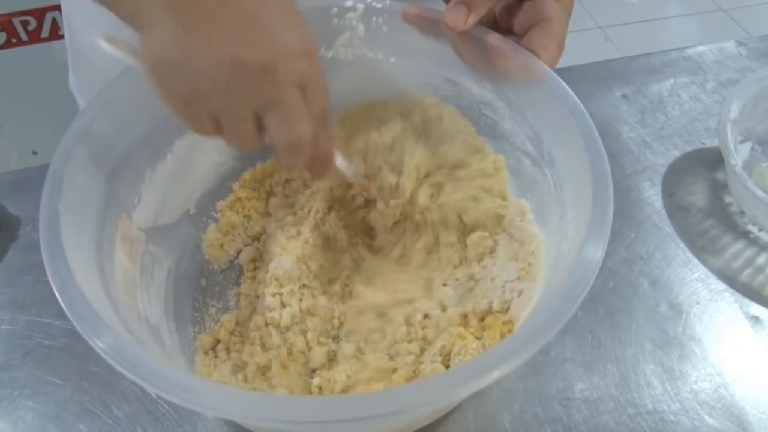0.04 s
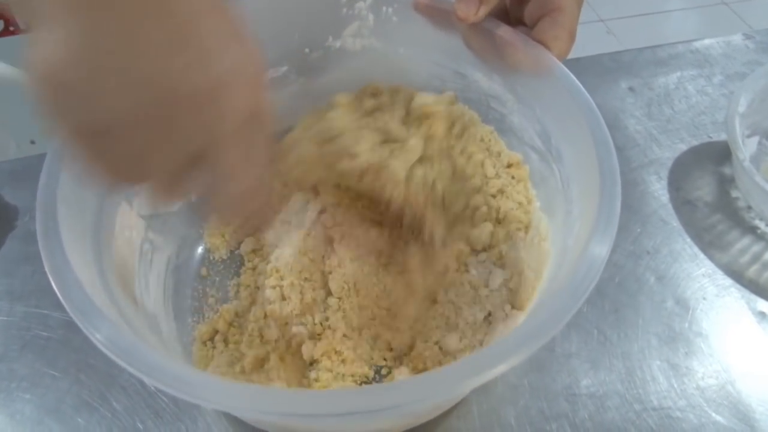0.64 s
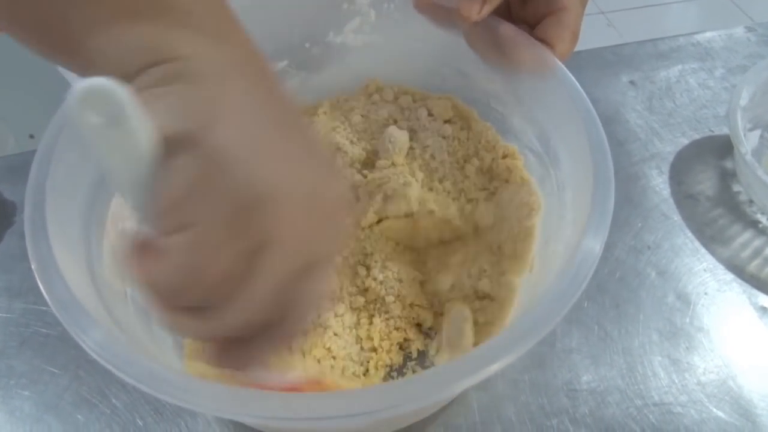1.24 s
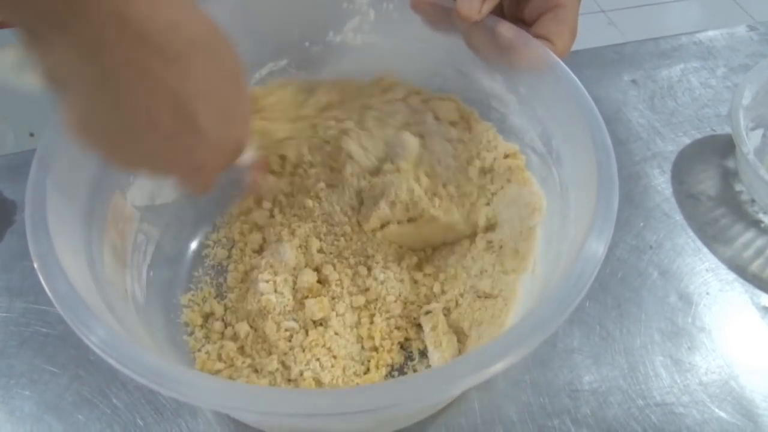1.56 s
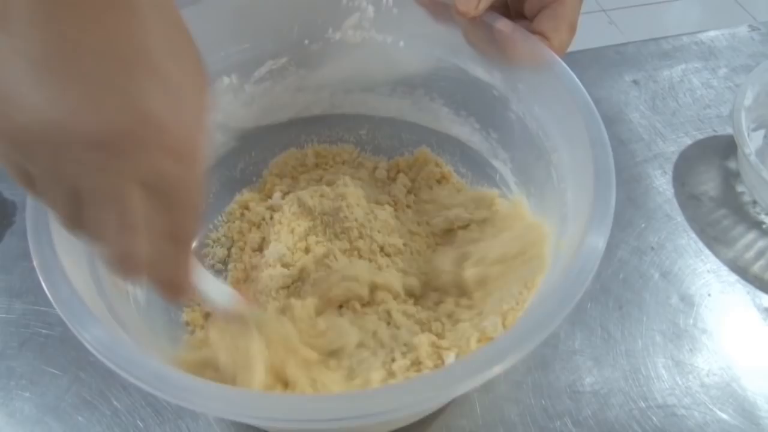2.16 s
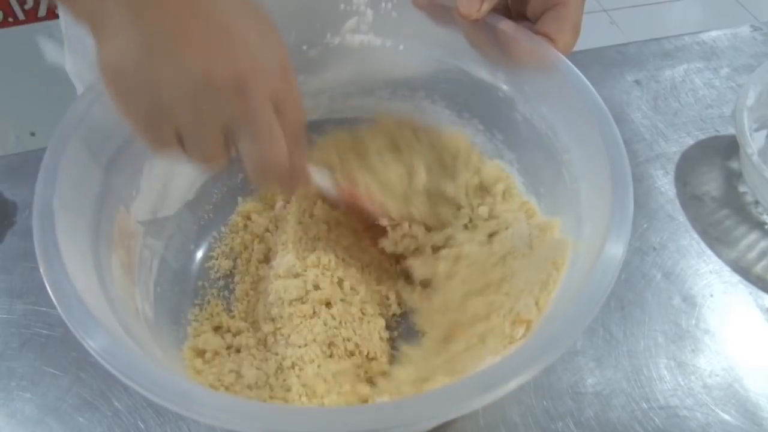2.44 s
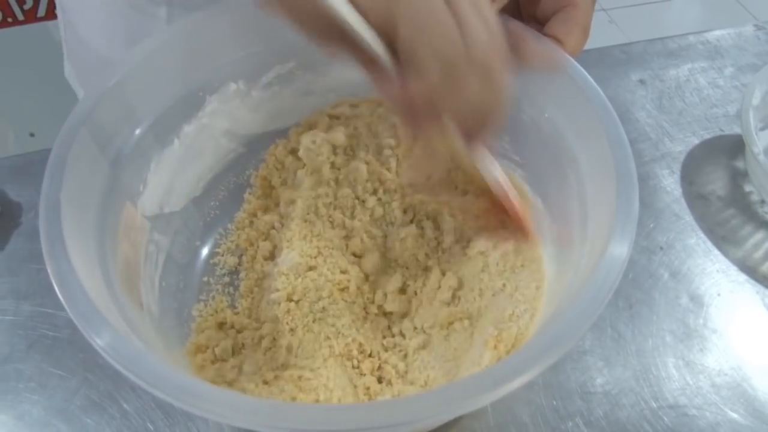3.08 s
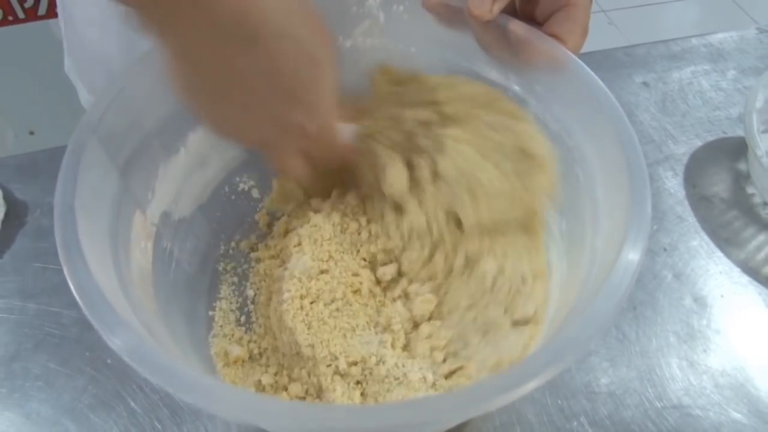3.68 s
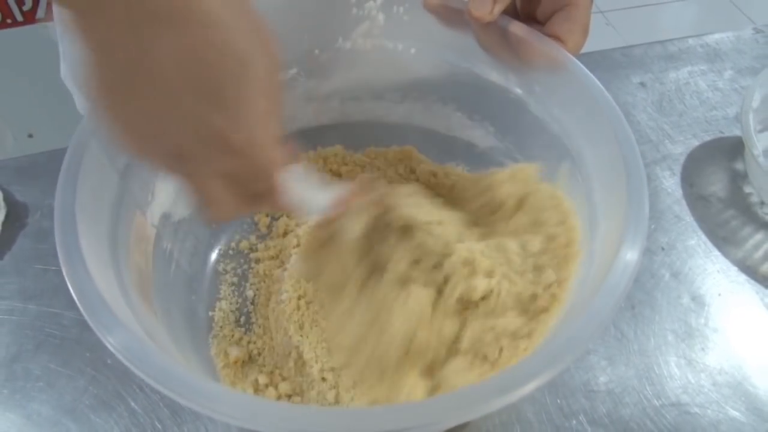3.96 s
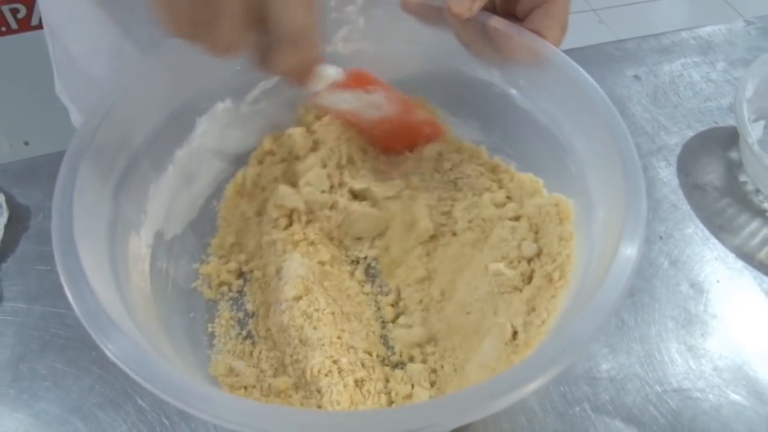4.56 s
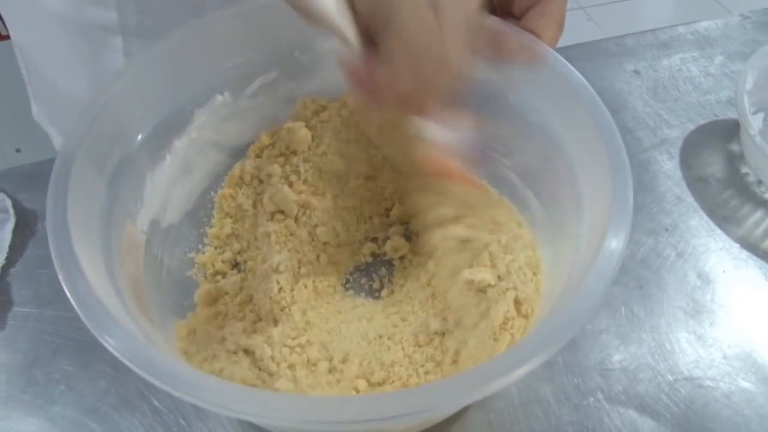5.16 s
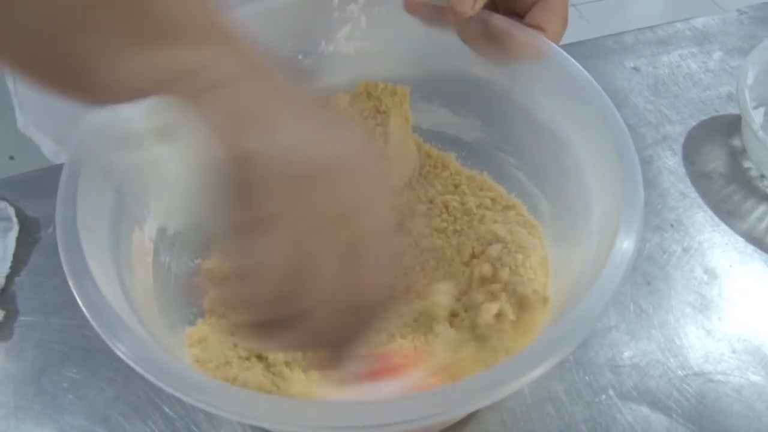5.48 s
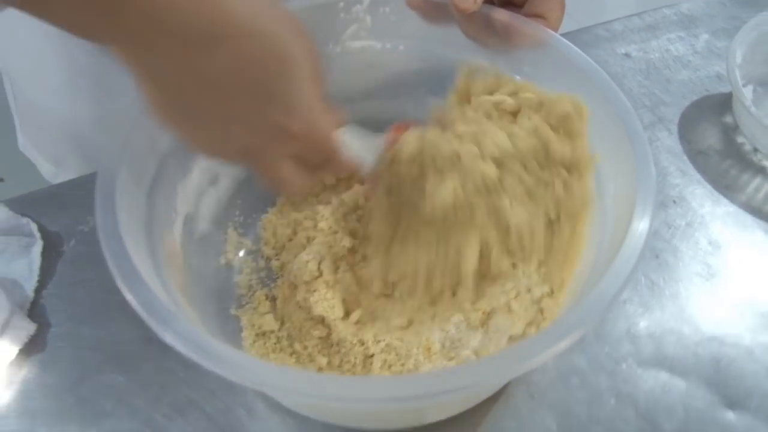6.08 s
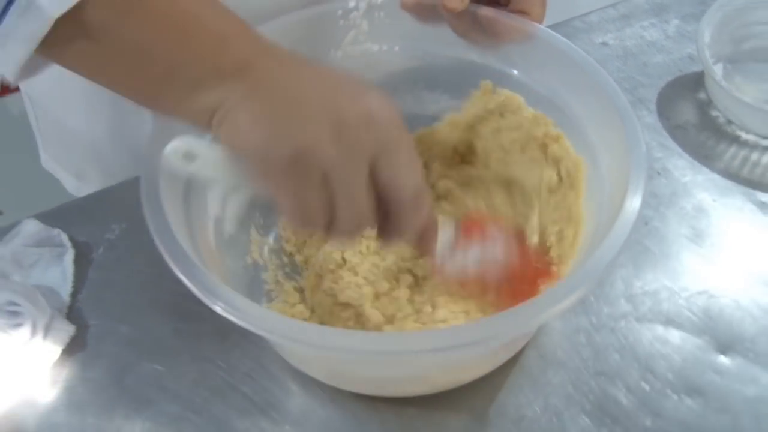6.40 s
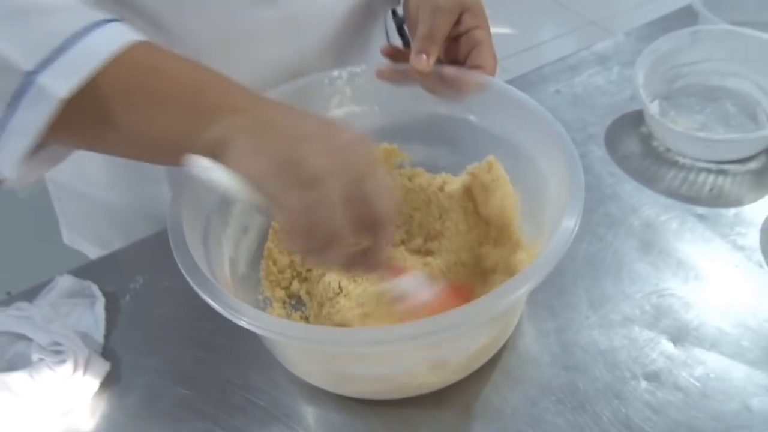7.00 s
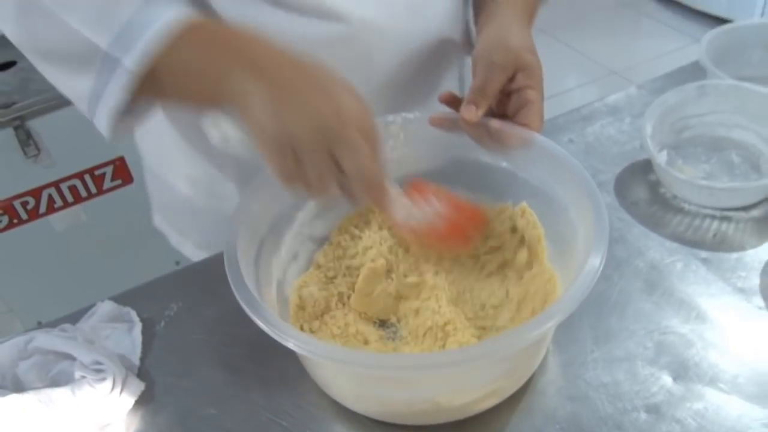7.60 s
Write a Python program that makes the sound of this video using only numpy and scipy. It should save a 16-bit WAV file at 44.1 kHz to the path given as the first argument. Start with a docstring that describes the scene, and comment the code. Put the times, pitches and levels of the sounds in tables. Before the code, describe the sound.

A plastic spoon stirs a dry, crumbly mix in a plastic bowl, with close gritty rustling, scraping and scattered knocks.

```python
"""A plastic spoon stirs a dry, crumbly mix in a plastic bowl on a steel counter, heard close up in mono.
Over faint kitchen air and hum, the spoon digs in at once and knocks the bowl within half a second.
Stroke after stroke then pushes the heap, rubs the bowl, shears crumbs and scrapes flour along the wall.
More knocks and ticks follow, echoing briefly in the small room; the hardest comes at about 6 s.
In the last second the strokes grow lighter and die away."""
import sys
import numpy as np
from scipy import signal
from scipy.fft import rfft, irfft, next_fast_len
from scipy.io import wavfile
from scipy.ndimage import uniform_filter1d, map_coordinates

SR = 44100
rng = np.random.default_rng(int(sys.argv[2]) if len(sys.argv) > 2 else 0)


def unload_wav(signal):
    """Save mono or channel-first audio to the path in sys.argv[1] as 16-bit WAV at rate SR, clipped to [-1, 1]."""
    wavfile.write(
        sys.argv[1],
        SR,
        np.round(np.clip(np.atleast_2d(signal).T, -1, 1) * 32767).astype(np.int16),
    )


N = 345855

# tone colour of the room air: frequency_hz, relative_db
AIR_COLOUR = [(25, -37.5), (60, 6), (100, -14), (250, -5), (600, 4.5), (1500, -19), (4000, -22.5),
              (15000, -29.5)]
# tones of a kitchen motor: pitch_hz, level_db
MOTOR_TONES = [(177, -79.5), (352, -82)]
# how long the room's echo takes to fade by 60 dB: frequency_hz, fade_s
ECHO_FADES = [(150, 0.44), (600, 0.21), (2000, 0.25), (6000, 0.086), (15000, 0.099)]

# broad resonances of the filled bowl: centre_hz, width_hz, relative_db
BOWL_RESONANCES = [(190, 190, -5), (449, 160, 9.5), (933, 266, 5.5), (1715, 250, 4.5), (2300, 760, 0),
                   (3620, 810, 1), (5230, 3100, -4), (8950, 5800, -39)]
# ringing tones of the free wall above the mix: pitch_hz, relative_db, fade_s (to fall by 60 dB)
WALL_TONES = [(498.4, -2, 0.17), (562.5, 4, 0.096), (906, -15, 0.089), (1034, -3.5, .08),
              (1622, 3.5, 0.035), (1760, -5.5, 0.086), (1816, 2, 0.021), (2044, 7, 0.033),
              (2370, -10, 0.042), (2930, 1.5, 0.028), (4800, 3, 0.054)]
# the spoon hits the bowl: time_s, knock_peak_db, low_hz, high_hz, ring_db (relative to the knock)
SPOON_HITS = [(0.3093, -22.5, 1590, 2630, -14), (.34, -27, 1400, 2860, -6.5), (.427, -9.5, 990, 1910, -7.5),
              (0.4563, -28, 504, 6040, -29), (0.809, -34.5, 1900, 2020, -0.5),
              (1.605, -21.5, 1330, 2400, -25), (1.7507, -15.5, 326, 2400, -12),
              (1.7997, -24, 1700, 2410, -3), (2.3624, -12, 640, 2000, -26), (2.73, -30.5, 1150, 2130, -10),
              (2.888, -31.5, 1540, 2050, -10), (3.5007, -11, 2800, 4970, -22),
              (3.776, -10.5, 332, 2410, -8), (4.148, -32.5, 1800, 2420, -2.5),
              (5.4728, -23.5, 1490, 5840, -11), (5.542, -25, 3000, 8000, -29),
              (5.831, -25.5, 1450, 2980, -18), (6.007, -12, 1700, 4800, -30), (6.0245, -8, 397, 2370, -12),
              (6.322, -31.5, 1560, 2980, -6), (6.464, -30, 500, 1960, -9.5), (7.459, -43, 890, 10900, -22),
              (7.829, -34, 453, 1980, -6)]

# tone colours of the five stirring noises: frequency_hz, relative_db
PUSH_COLOUR = [(25, -39), (45, -11), (65, -1), (100, 2.5), (155, -2), (190, 3.5), (235, -1), (310, 2),
               (520, -2), (720, -5), (1100, -7.5), (2500, -42)]  # the heap being shoved
RUB_COLOUR = [(300, -14.5), (600, -7), (800, -7.5), (980, -1), (1200, -5), (1420, -3), (1620, -1.5),
              (1860, 0.5), (2300, -4.5), (3000, -6.5), (5000, -50)]  # the spoon on the bowl
RUSTLE_COLOUR = [(900, -51.5), (1900, -12), (2600, -2), (3500, 1), (4000, -1), (4700, -0.5), (6500, -5),
                 (8500, -9), (14000, -30.5)]  # crumbs sliding past each other
SCRAPE_COLOUR = [(2500, -35.5), (5000, -4.5), (7000, -1), (9000, -0.5), (11500, -3), (13300, -7.5),
                 (15000, -10.5), (16000, -7)]  # flour dragged along the wall
FINE_FLOUR_COLOUR = [(5000, -40), (9000, -9.5), (11500, 0), (13300, -3), (15000, -1)]  # the finest flour under a fast blade

# The next five tables give base levels, which the functions shift and shake.
# the spoon is drawn through the mix: start_s, rise_s, length_s, rustle_db, rub_db, hiss_db
SPOON_STROKES = [(-0.043, 0.037, 0.095, -49, -42.5, -55), (0.284, 0.116, 0.29, -51, -49, -56.5),
                 (0.784, 0.12, 0.21, -51.5, -47.5, -54.5), (1.069, 0.049, 0.059, -61.0, -51.5, -64.5),
                 (1.171, 0.052, 0.42, -47.5, -50, -55.5), (1.539, 0.011, 0.4, -46.5, -45.5, -53.5),
                 (2.089, 0.19, 0.14, -52, -46, -57.5), (2.253, 0.045, 0.24, -52.0, -48, -58.5),
                 (2.715, 0.074, 0.26, -53, -55, -56.5), (3.096, 0.14, 0.35, -46, -52.5, -52),
                 (3.442, 0.034, 0.44, -47, -46, -53.0), (3.904, 0.047, 0.13, -60.5, -58.5, -59.5),
                 (4.134, 0.0086, 0.059, -56.5, -52, -59), (4.205, 0.054, 0.25, -51, -49, -57),
                 (4.458, 0.38, 0.36, -52, -46, -64), (4.911, 0.045, 0.16, -59.5, -50, -65.5),
                 (5.034, 0.062, 0.24, -52, -51, -56.5), (5.379, 0.022, 0.15, -47, -50.5, -52),
                 (5.552, 0.02, 0.14, -49.5, -55, -54.5), (5.687, 0.055, 0.42, -45.5, -46, -52.5),
                 (6.151, 0.036, 0.18, -55.5, -55, -56), (6.327, 0.07, 0.2, -52, -51, -53.5),
                 (6.55, 0.063, 0.082, -51.0, -49.5, -58), (6.768, 0.045, 0.25, -51.5, -53.5, -54.5),
                 (7.035, 0.023, 0.2, -54, -57.0, -61.5), (7.437, 0.033, 0.12, -53.5, -53.5, -56.0),
                 (7.663, 0.048, 0.16, -64, -61, -71.0)]
# the spoon's blade sweeps fast along the floury wall: start_s, rise_s, length_s, hiss_db
FAST_SWEEPS = [(1.21, 0.045, 0.044, -46), (2.768, 0.12, 0.175, -44), (3.135, 0.076, 0.128, -49.5),
               (4.742, 0.053, 0.095, -52.0), (5.097, 0.071, 0.14, -41), (5.384, 0.034, 0.15, -44.5)]
# the spoon digs into the heap: start_s, rise_s, push_db, settle_s
HEAP_DIGS = [(0.0, 0.0077, -47.5, 0.12), (0.384, 0.014, -40.5, 0.13), (.857, .01, -46, .07),
             (0.9302, .003, -40, 0.11), (1.59, 0.026, -48.5, 0.087), (1.75, .01, -53.5, 0.22),
             (2.29, 0.0083, -41, 0.058), (2.465, 0.018, -54, 0.077), (3.47, 0.027, -45, .05),
             (3.615, 0.014, -47.5, 0.036), (3.776, 0.0092, -53, 0.16), (4.2432, 0.00077, -41, 0.12),
             (5.655, 0.015, -52.5, .05), (5.871, .02, -41, 0.13), (6.4365, 0.0049, -47, 0.084),
             (6.98, .002, -56, .07), (7.503, .002, -47.5, .11)]
# the blade's edge bites on the bare wall: peak_s, half_length_s, pitch_hz, level_db
EDGE_BITES = [(1.267, .02, 5260, -48.5), (1.324, 0.054, 7200, -51), (1.45, 0.033, 4770, -48),
              (1.595, 0.05, 8100, -50), (3.498, 0.018, 4480, -37.5), (5.495, 0.047, 5660, -41.5),
              (5.734, 0.027, 3720, -49)]
# the blade bears down and chatters through crumbs: peak_s, half_length_s, rub_db, rustle_db
BLADE_PRESSES = [(0.05, 0.015, -41.5, -61), (1.853, 0.081, -45.5, -54), (2.215, .008, -48, -58),
                 (2.327, 0.017, -37, -47), (2.773, 0.014, -47, -55), (2.897, .015, -55, -47),
                 (3.824, 0.021, -42.5, -47), (4.273, 0.021, -42, -49.5), (4.83, 0.035, -51, -49.5),
                 (5.04, .025, -47, -60), (5.163, 0.014, -46.5, -48), (5.44, 0.031, -44, -50),
                 (5.74, 0.028, -55, -42.5), (6.318, 0.0092, -49, -62), (6.638, 0.024, -47.5, -62)]

LIFT_S, SWEEP_RELEASE_S = 0.052, 0.013  # how fast a stroke and a sweep die away
TRICKLE_DB, TRICKLE_S = -12.5, 0.087  # loose crumbs keep sliding after the spoon lifts
HEAP_DB = -13.5  # rumble of the moving heap, relative to the rub
DIG_RUB_DB, THUD_DB = -17.5, 11.5  # a dig's rub and an instant landing's thud, relative to push_db
DIG_HOLD_S, THUD_RISE_S = 0.0069, 0.0073  # time at full push; the rise time that halves the thud
IDLE_RUSTLE_DB, IDLE_RUB_DB, IDLE_HISS_DB = -71.5, -63.5, -78  # the heap never quite comes to rest
HAND_DB, HAND_PER_S = 0.7, 24  # unsteadiness of the hand's pressure
PUFF_DB, PUFF_RISE_S, PUFF_FADE_S = -56, .003, 0.0049  # every hit shakes flour off the blade


def amp(db):
    """Turn decibels into a gain."""
    return 10 ** (np.asarray(db) / 20)


def unit(x):
    """Scale to an average strength (rms) of 1."""
    return x / np.sqrt(np.mean(x ** 2) + 1e-20)


def along(points, hz):
    """Read between (frequency, value) points on a logarithmic frequency scale."""
    frequencies, values = np.transpose(points)
    return np.interp(np.log(hz + 1), np.log(frequencies), values)


def filtered(x, response):
    """Multiply each frequency in x by response(hz)."""
    size = next_fast_len(len(x) + 8192)
    return irfft(rfft(x, size) * response(np.fft.rfftfreq(size, 1 / SR)), size)[:len(x)]


def coloured(x, colour):
    """Give x a tone colour, at strength 1."""
    return unit(filtered(x, lambda hz: amp(along(colour, hz))))


def resonance(x, hz, octaves):
    """Keep a band of x around hz, which may move over time."""
    f, t, spectrum = signal.stft(x, SR, nperseg=256)
    distance = np.log2((f[:, None] + 1) / np.interp(t * SR, np.arange(N), hz))
    return unit(signal.istft(spectrum / (1 + (distance / octaves) ** 2), SR, nperseg=256)[1][:N])


def wobble(per_s):
    """A smooth curve through per_s random values a second."""
    return map_coordinates(rng.standard_normal(int(N * per_s / SR) + 4), [np.arange(N) * per_s / SR])


def envelope(start_s, rise_s, length_s, release_s):
    """Rise, hold until length_s after the start, then die away."""
    t = np.arange(N) / SR - start_s
    return np.clip(t / rise_s, 0, 1) * np.exp(-np.maximum(t - length_s, 0) / release_s)


def swell(peak_s, half_s):
    """A bell-shaped rise and fall around a moment."""
    return np.exp(-.5 * ((np.arange(N) / SR - peak_s) / half_s) ** 2)


def air_and_hum():
    """Faint room air with a slightly unsteady motor hum."""
    t = np.arange(N) / SR
    hum = sum(amp(db) * unit(np.sin(2 * np.pi * hz * t + 0.25 * wobble(4.5))) for hz, db in MOTOR_TONES)
    return hum + amp(-71.5) * coloured(rng.standard_normal(N), AIR_COLOUR)


def kitchen_echo(x, gap_s=.004):
    """Counter and walls throw back a blur of sound; the treble dies first."""
    hz, t, noise = signal.stft(rng.standard_normal(SR // 2), SR, nperseg=256)
    fade = amp(-60 * t / along(ECHO_FADES, hz)[:, None])
    tail = signal.istft(noise * fade, SR, nperseg=256)[1]
    tail = np.pad(tail / np.linalg.norm(tail), (round(gap_s * SR), 0))
    return signal.fftconvolve(x, tail)[:N]


def bowl_response(hz, spread_s=0.000693):
    """The bowl colours a blow and smears it, as low bending waves travel more slowly."""
    body = sum(amp(db) * 1j * hz * width / (centre ** 2 - hz ** 2 + 1j * hz * width)
               for centre, width, db in BOWL_RESONANCES)
    return body * np.exp(-4j * np.pi * spread_s * np.sqrt(1000 * hz))  # spread_s: delay at 1 kHz


def bowl_blow(low_hz, high_hz, ring_db, crunch_db, build_s=0.00056, crunch_s=0.021):
    """One blow, cushioned by the mix, crushes crumbs and bends the bowl; the free wall rings on."""
    t = np.arange(SR // 5) / SR
    stiffness = signal.butter(2, low_hz, "high", fs=SR, output="sos")
    cushion = signal.butter(4, high_hz, fs=SR, output="sos")
    crunch = rng.standard_normal(len(t)) * amp(crunch_db - 60 * t / crunch_s)
    force = signal.sosfilt(stiffness, signal.sosfilt(cushion, t == 0) + crunch)
    knock = filtered(force, bowl_response)
    wall = np.zeros(len(t))
    for hz, db, fade_s in WALL_TONES:
        level = amp(db + rng.standard_normal() - 60 * t / fade_s)
        wall += level * np.sin(2 * np.pi * (hz * t + rng.random()))
    ring = signal.fftconvolve(force, wall * (1 - np.exp(-t / build_s)))[:len(t)]
    return knock / np.abs(knock).max() + amp(ring_db) * ring / np.abs(ring).max()


def knocks(thud_low_hz=80, thud_high_hz=540, thud_ring_db=-20):
    """Hits on the bowl and soft thuds in the heap; a lighter touch has a larger share of crunch."""
    out = np.zeros(N + SR)
    thuds = [(s, db + THUD_DB - 20 * np.log10(1 + rise / THUD_RISE_S),
              thud_low_hz, thud_high_hz, thud_ring_db) for s, rise, db, _ in HEAP_DIGS]
    for s, db, low_hz, high_hz, ring_db in SPOON_HITS + thuds:
        blow = amp(db) * bowl_blow(low_hz, high_hz, ring_db, crunch_db=-48.5 - 0.26 * db)
        out[round(s * SR):][:len(blow)] += blow
    return out[:N]


def grains(per_s, scatter_db=4):
    """Grains slip at random moments, making tiny clicks of many sizes."""
    moments = rng.random(N) < per_s / SR
    size = amp(scatter_db * np.clip(rng.standard_normal(N), -2.5, 2.5))
    return unit(moments * size * rng.choice([-1, 1], N))


def edge_swishes():
    """The blade's edge swishes grittily on the wall; its pitch glides from one bite to the next."""
    level = sum(amp(db) * swell(s, half) for s, half, _, db in EDGE_BITES)
    peaks_s, _, pitches_hz, _ = np.transpose(EDGE_BITES)
    glide_hz = np.interp(np.arange(N) / SR, peaks_s, pitches_hz)
    flicker = amp(2.9 * wobble(70))
    return level * flicker * resonance(grains(3000), glide_hz, octaves=0.49)


def slips(per_s, settle_s):
    """The mix gives way suddenly, then settles: a saw-toothed random curve."""
    kicks = (rng.random(N) < per_s / SR) * rng.uniform(0.5, 1, N)
    settling = np.sqrt(signal.lfilter([1], [1, -np.exp(-1 / (settle_s * SR))], kicks))
    return unit(settling - settling.mean())


def shifting_heap(x, depth_db):
    """The heap keeps changing shape, so its colour drifts in patches about 800 Hz wide and 70 ms long."""
    spectrum = signal.stft(x, SR, nperseg=512)[2]
    patches = uniform_filter1d(rng.standard_normal(spectrum.shape), 9, axis=0)
    patches = uniform_filter1d(patches, 12, axis=1)
    return signal.istft(spectrum * amp(depth_db * unit(patches)), SR, nperseg=512)[1][:N]


def stroke(start_s, rise_s, length_s):
    """The strength of one pass of the spoon and of the crumbs trickling behind it."""
    trickle = amp(TRICKLE_DB) * envelope(start_s, rise_s, length_s, TRICKLE_S)
    return np.maximum(envelope(start_s, rise_s, length_s, LIFT_S), trickle)


def spoon_effort():
    """All the spoon's movements add in power, giving dB curves for push, rub, rustle and scrape."""
    passes = np.array([stroke(s, rise, length) for s, rise, length, *_ in SPOON_STROKES])
    rustle, rub, hiss = amp(np.array(SPOON_STROKES)[:, 3:]).T ** 2 @ passes ** 2
    presses = np.array([swell(s, half) for s, half, *_ in BLADE_PRESSES])
    chatter, crush = amp(np.array(BLADE_PRESSES)[:, 2:]).T ** 2 @ presses ** 2
    sweep = sum((amp(db) * envelope(s, rise, length, SWEEP_RELEASE_S)) ** 2
                for s, rise, length, db in FAST_SWEEPS)
    dig = sum((amp(db) * envelope(s, rise, rise + DIG_HOLD_S, settle)) ** 2
              for s, rise, db, settle in HEAP_DIGS)
    puff = sum((amp(PUFF_DB) * envelope(s - PUFF_RISE_S, PUFF_RISE_S, PUFF_RISE_S, PUFF_FADE_S)) ** 2
               for s, *_ in SPOON_HITS)
    rub = rub + amp(IDLE_RUB_DB) ** 2
    powers = [dig + amp(HEAP_DB) ** 2 * rub,
              rub + chatter + amp(DIG_RUB_DB) ** 2 * dig,
              rustle + crush + amp(IDLE_RUSTLE_DB) ** 2,
              hiss + sweep + puff + amp(IDLE_HISS_DB) ** 2]
    return 10 * np.log10(powers) + HAND_DB * wobble(HAND_PER_S)


def stirring():
    """Grainy friction noises follow the spoon, which catches and slips in all of them at once."""
    push_db, rub_db, rustle_db, scrape_db = spoon_effort()
    catch = slips(60, settle_s=0.021)
    heap_slip = slips(29, settle_s=0.029)
    push = amp(push_db - 3.5 + 1.8 * catch + 1.3 * heap_slip) * coloured(grains(1500), PUSH_COLOUR)
    rub = amp(rub_db - 2 + 2.1 * catch) * coloured(grains(2000), RUB_COLOUR)
    rustle = amp(rustle_db - 1 + 1.3 * catch) * coloured(grains(7000), RUSTLE_COLOUR)
    scrape = amp(scrape_db + 0.85 + 0.88 * catch) * coloured(grains(18000), SCRAPE_COLOUR)
    # a harder scrape is brighter, and its chatter sets the bowl wall buzzing
    fine = amp(1.224 * scrape_db + 5.5 + catch) * coloured(grains(14000), FINE_FLOUR_COLOUR)
    buzz = amp(scrape_db - 8 + 3 * catch) * resonance(grains(900), hz=np.full(N, 1700), octaves=0.13)
    # a few harder crumbs crack under the spoon
    clicks = filtered(grains(39), lambda hz: 1j * hz / (1j * hz + 1500) / (1 + 1j * hz / 6000) ** 2)
    cracks = amp(rustle_db - 22) * unit(clicks)
    return push + rub + shifting_heap(rustle + scrape, depth_db=1.5) + fine + buzz + cracks


def scene():
    """The bowl, its echo and the background reach one microphone."""
    friction = stirring() + edge_swishes()
    blows = knocks()
    echo = kitchen_echo(amp(-19.5) * friction + amp(-17) * blows)
    mono = friction + blows + echo + air_and_hum()
    return np.array([mono, mono])


def record(dry):
    """The small microphone loses the deepest bass, and the very highest treble is cut off."""
    bass_hz, top_hz = 38, 15850
    response = lambda hz: (hz < top_hz) * hz ** 4 / (hz ** 4 + bass_hz ** 4)
    return np.array([filtered(channel, response) for channel in dry])


dry = scene()
out = record(dry)
unload_wav(out)
```